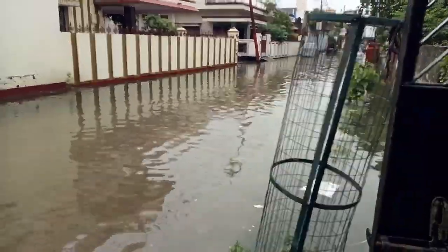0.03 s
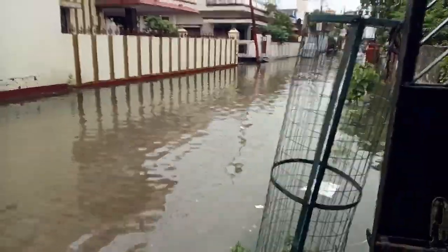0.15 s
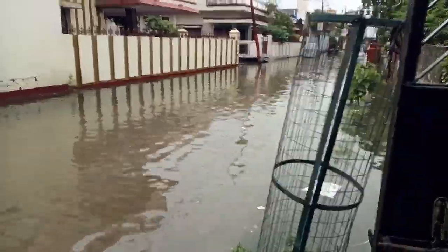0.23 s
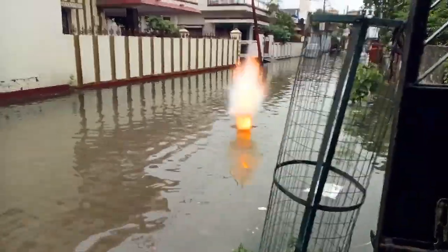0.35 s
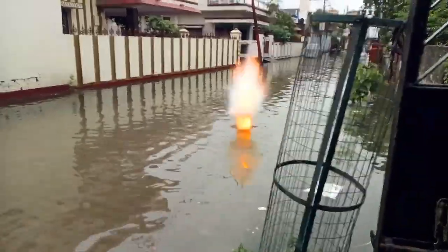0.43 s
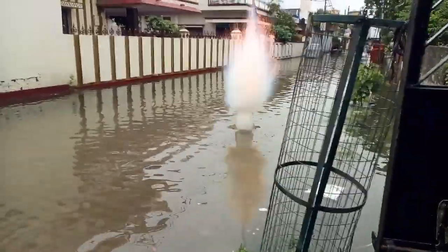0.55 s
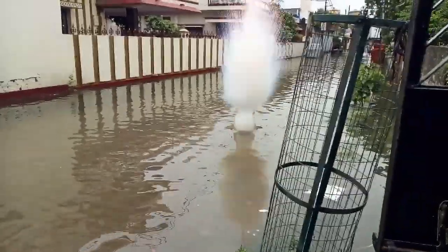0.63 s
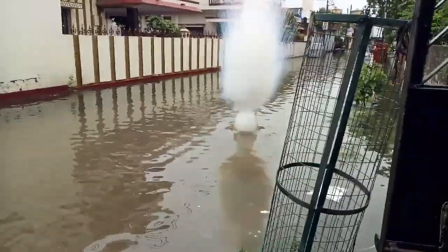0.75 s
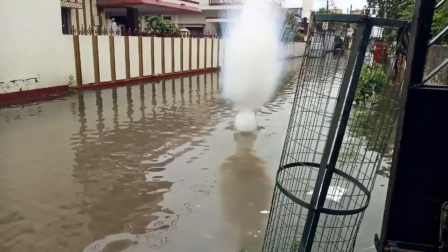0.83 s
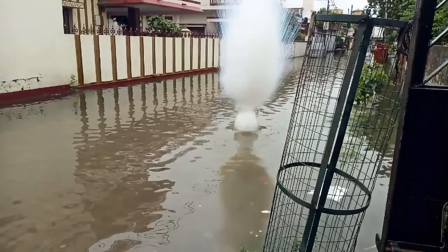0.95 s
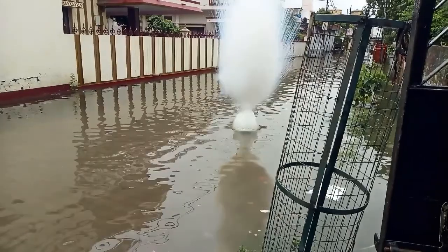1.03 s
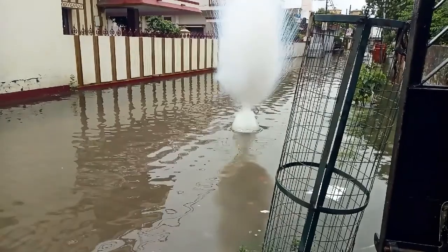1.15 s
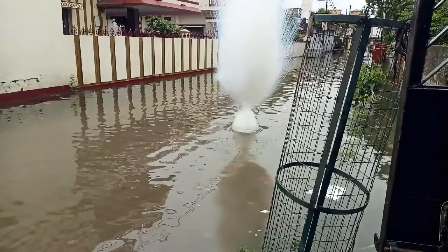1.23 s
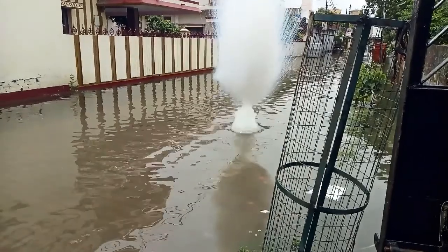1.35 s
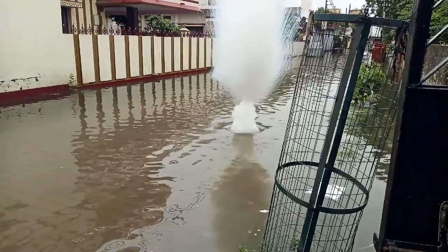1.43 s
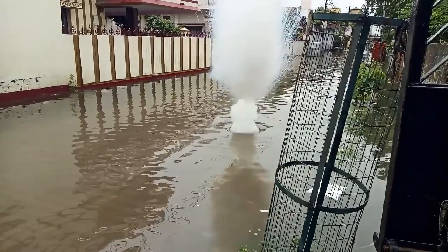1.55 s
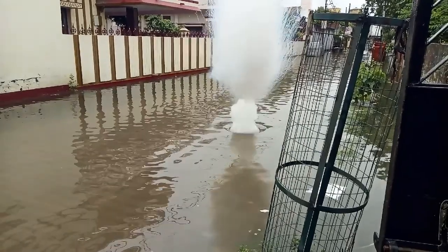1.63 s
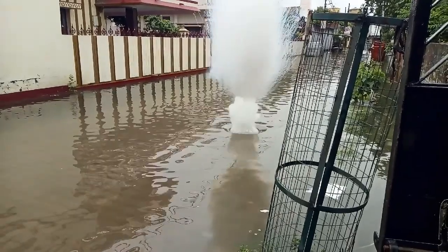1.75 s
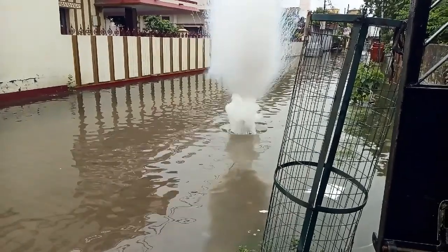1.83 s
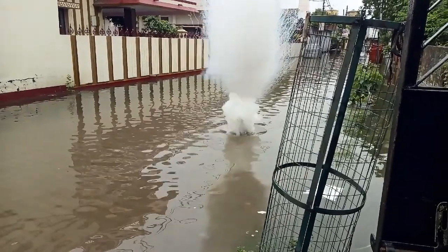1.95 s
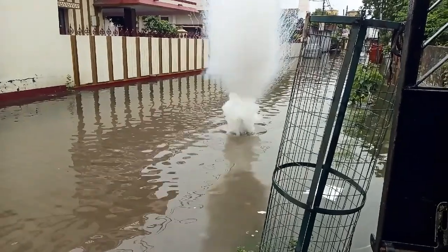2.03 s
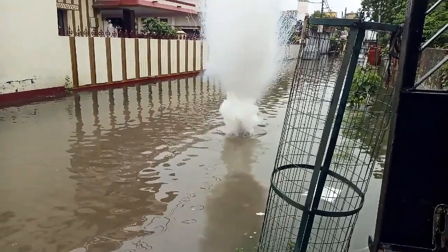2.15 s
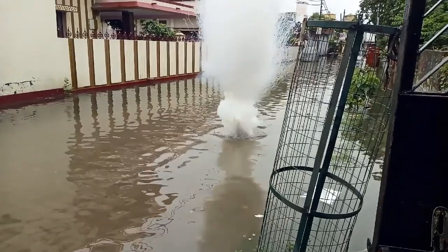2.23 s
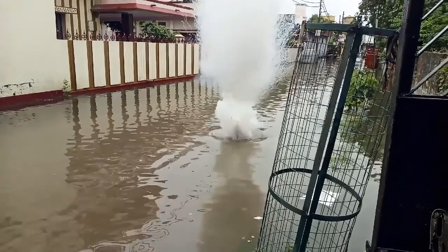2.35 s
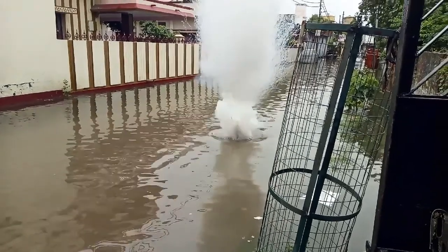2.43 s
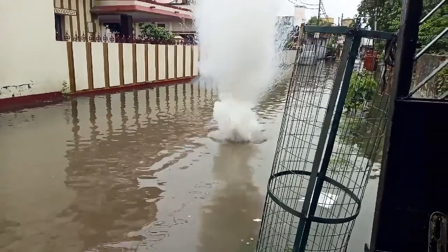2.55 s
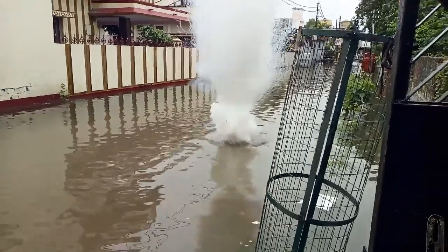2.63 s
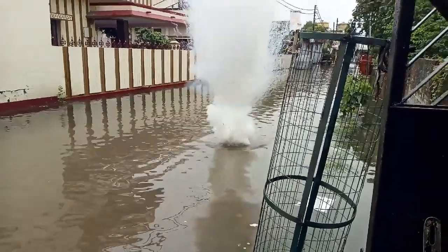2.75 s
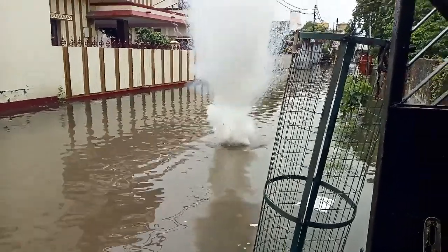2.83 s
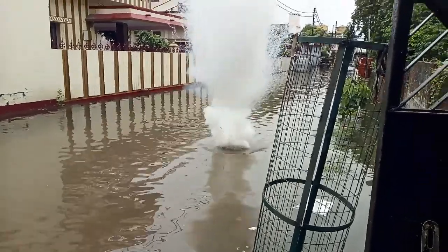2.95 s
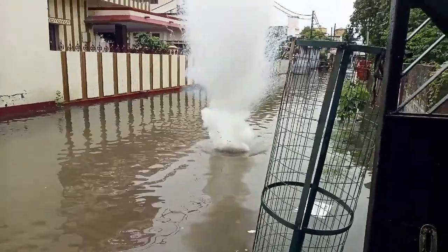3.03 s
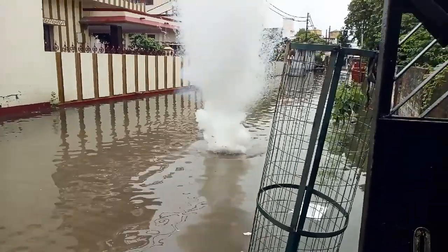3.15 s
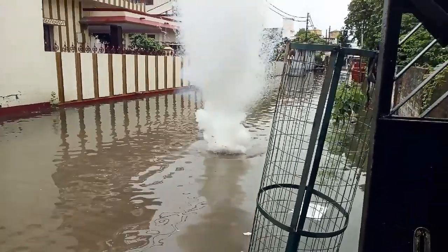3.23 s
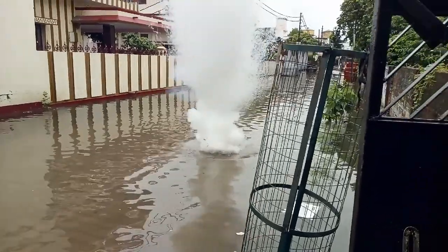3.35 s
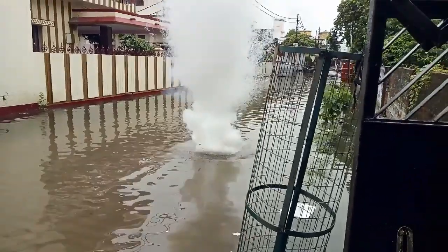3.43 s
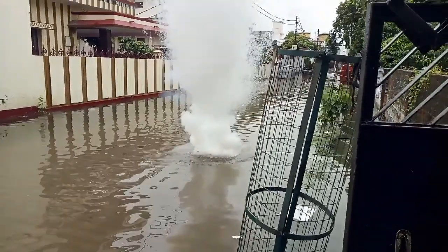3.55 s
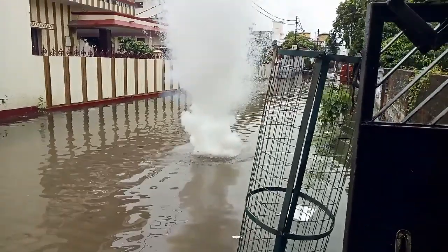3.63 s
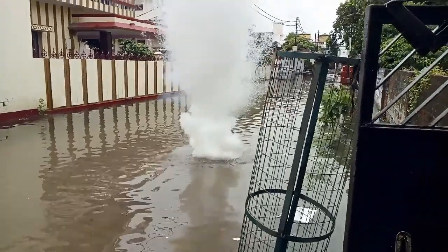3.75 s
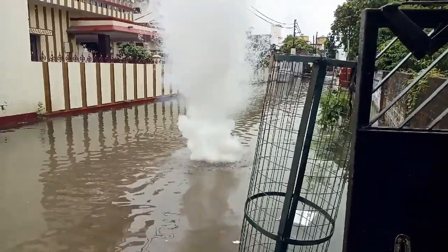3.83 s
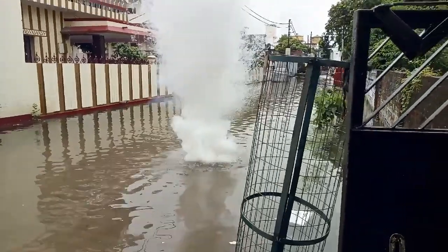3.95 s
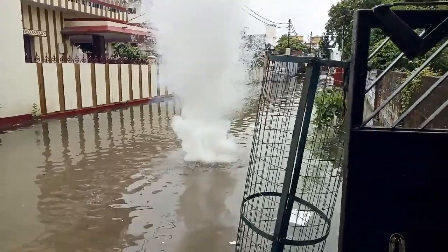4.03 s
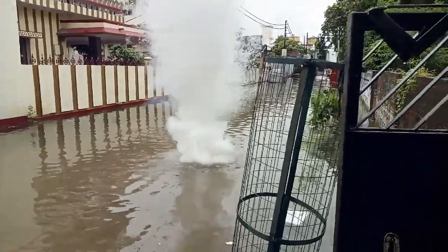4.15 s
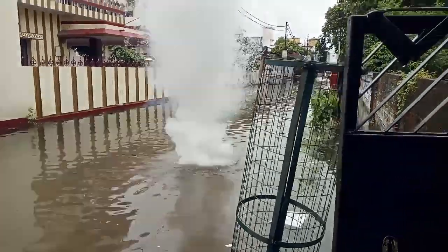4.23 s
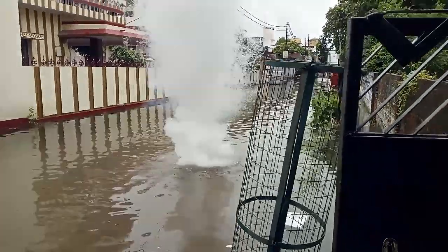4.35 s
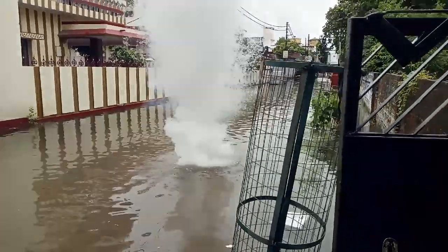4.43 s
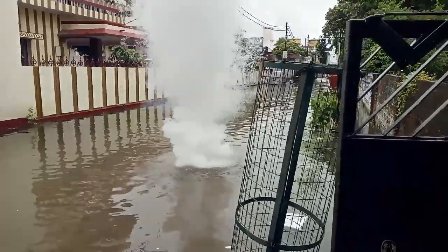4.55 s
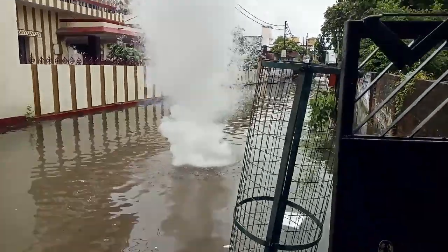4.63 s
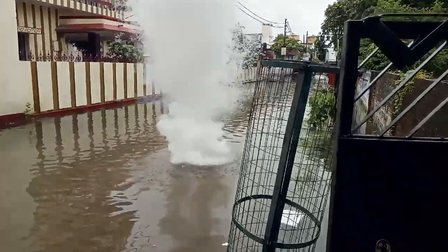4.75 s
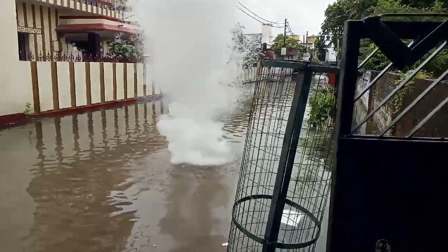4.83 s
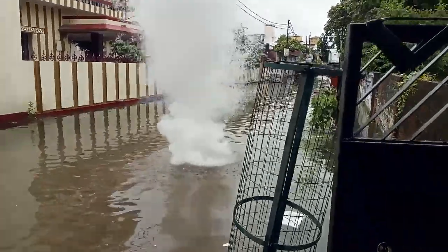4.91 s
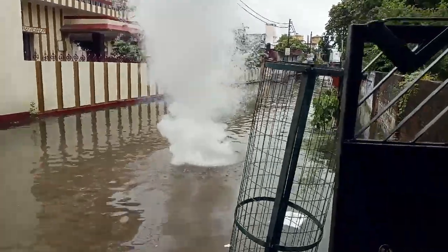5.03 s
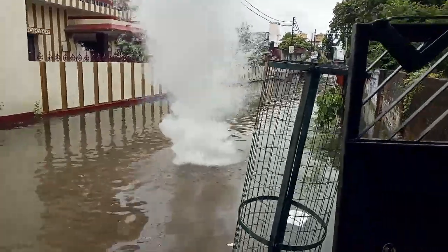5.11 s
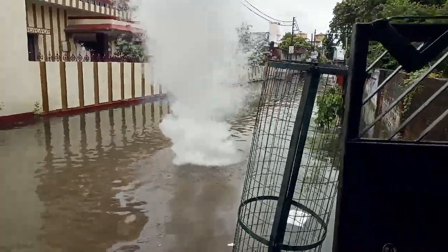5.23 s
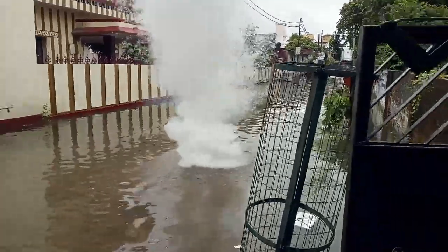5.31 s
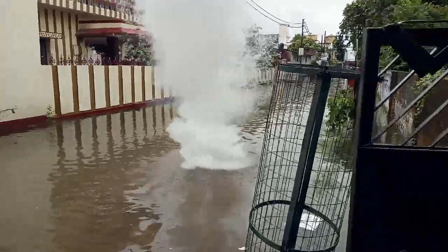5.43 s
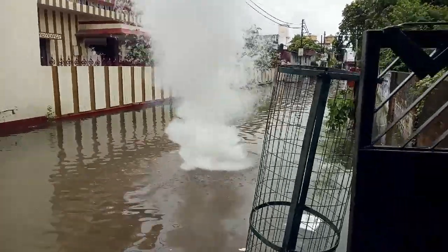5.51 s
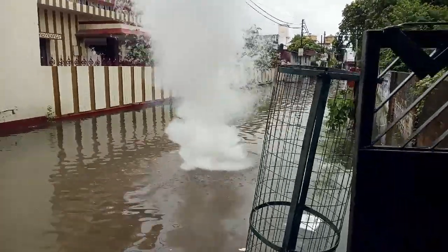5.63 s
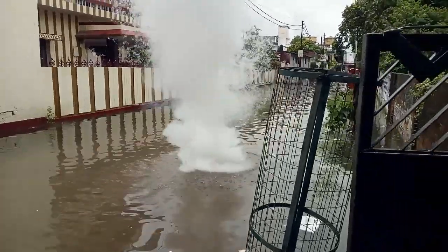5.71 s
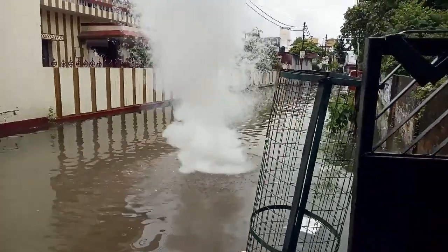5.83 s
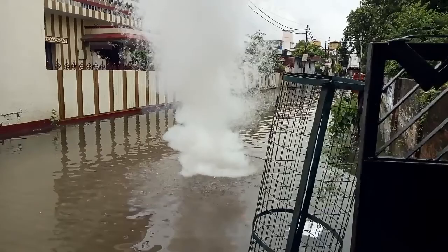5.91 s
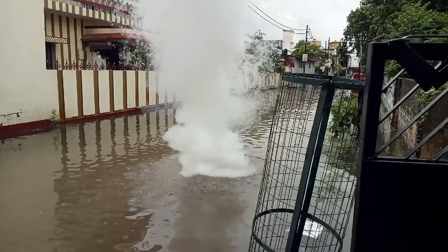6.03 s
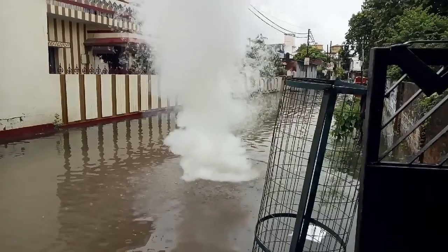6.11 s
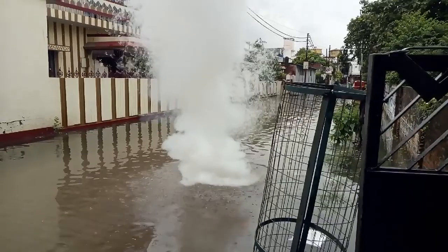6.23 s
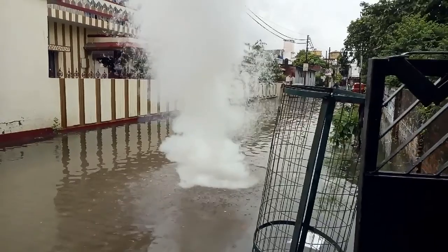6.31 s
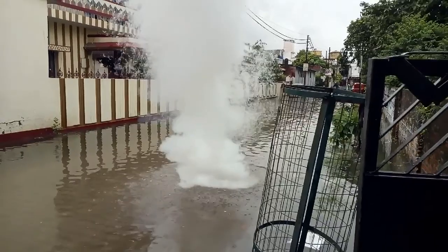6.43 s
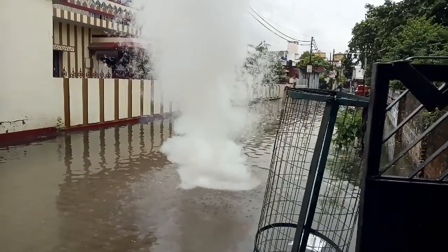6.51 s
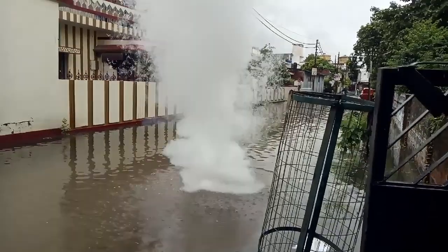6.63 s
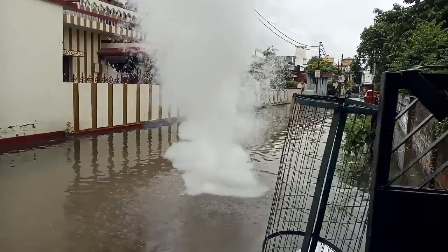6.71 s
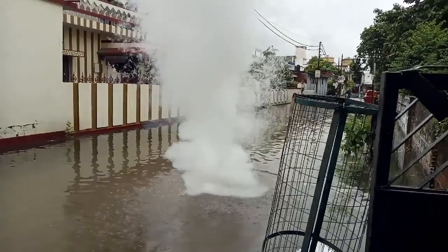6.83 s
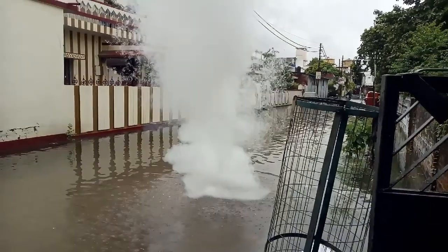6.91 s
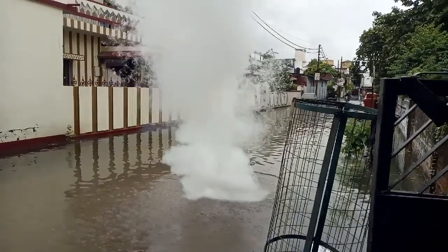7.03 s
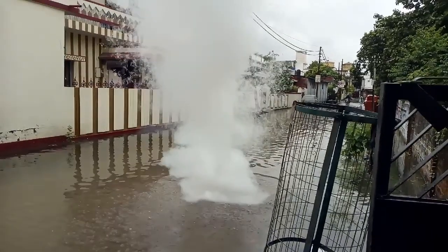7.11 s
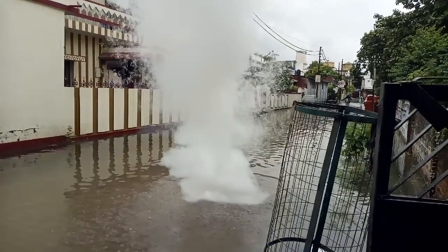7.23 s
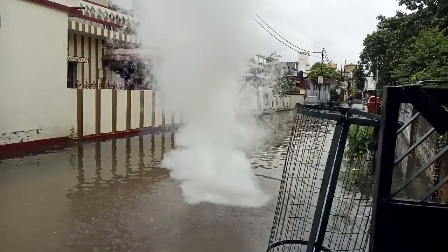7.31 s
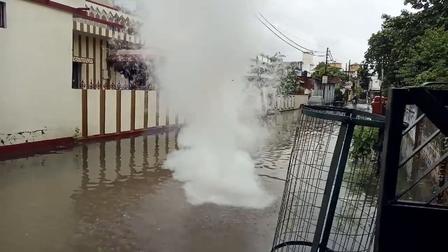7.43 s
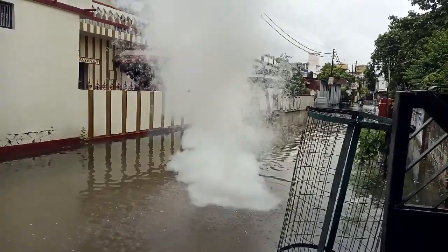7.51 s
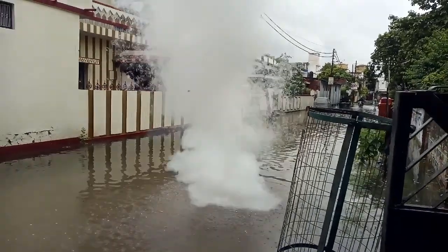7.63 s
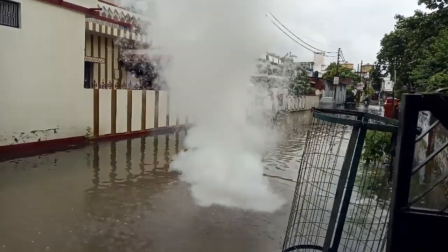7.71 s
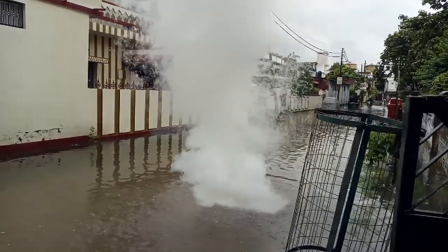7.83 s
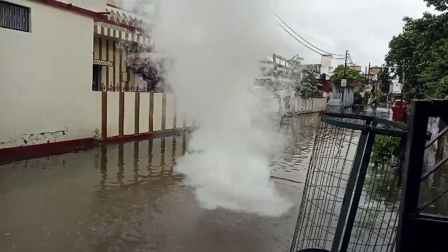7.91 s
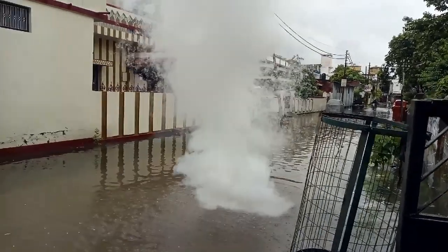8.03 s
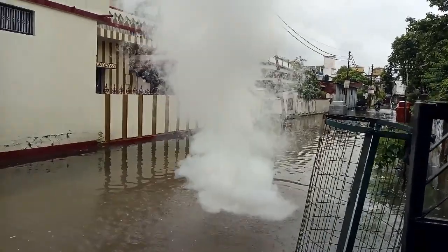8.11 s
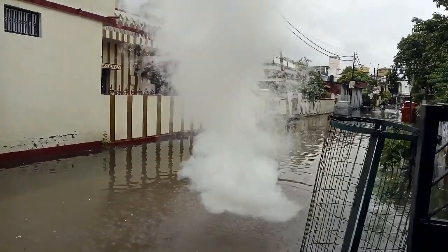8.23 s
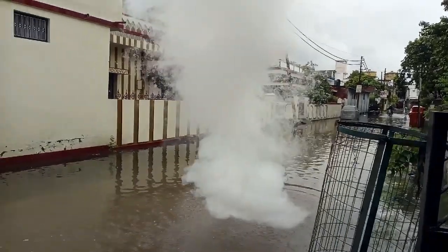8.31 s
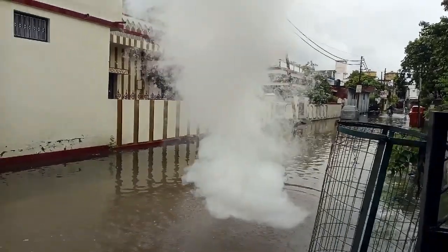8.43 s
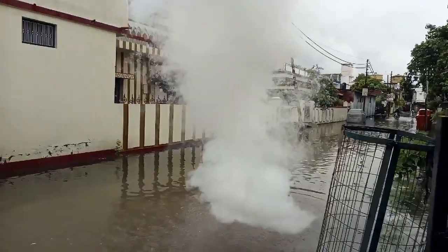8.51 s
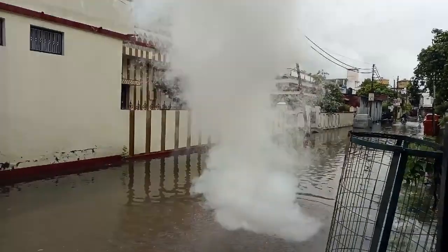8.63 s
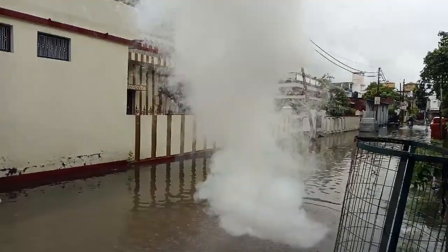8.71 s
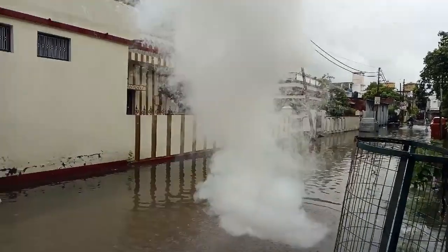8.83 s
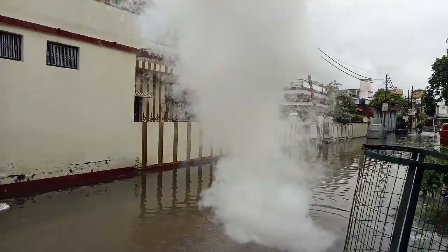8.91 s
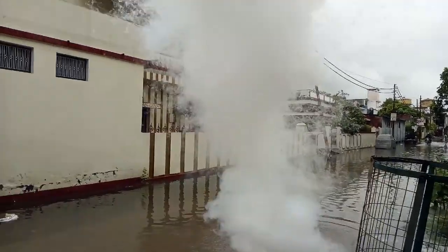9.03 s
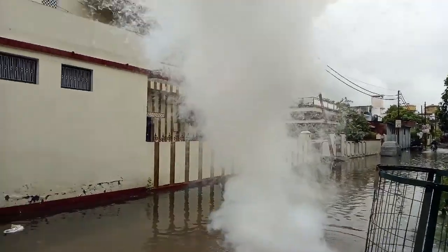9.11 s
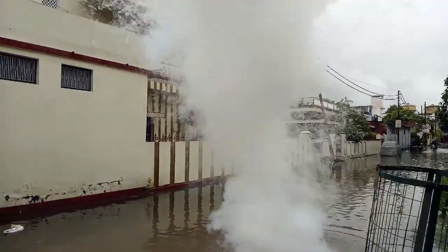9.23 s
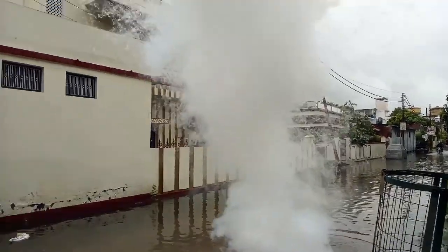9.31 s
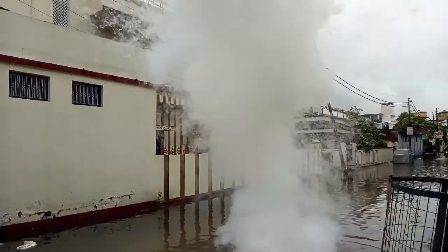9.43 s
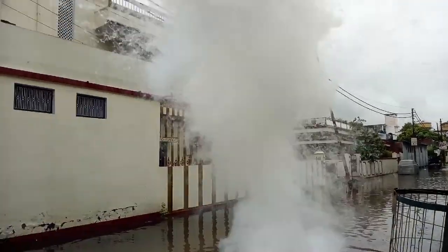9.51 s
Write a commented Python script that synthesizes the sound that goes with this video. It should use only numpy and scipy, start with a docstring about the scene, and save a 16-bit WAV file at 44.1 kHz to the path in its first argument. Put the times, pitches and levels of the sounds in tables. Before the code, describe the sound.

Metal explodes in floodwater with a deep, overloaded slow-motion boom that dies away as drops splash and patter down.

```python
"""Sodium explodes on a flooded street, heard in slow motion. Over a low murmur, a blast overloads the
microphone and rolls between the houses. The burning plume roars and fades as the first heavy drops splash
down. Then spray patters on the water, scattered metal spits, froth rings and faint hums swell far away.
Throughout, the slowed sound is played with each sample held, which lays a gritty sheen over it."""
import sys
import numpy as np
from scipy import signal
from scipy.fft import rfft, irfft, next_fast_len
from scipy.io import wavfile
from scipy.ndimage import uniform_filter1d, map_coordinates

SR = 44100
rng = np.random.default_rng(int(sys.argv[2]) if len(sys.argv) > 2 else 0)


def log_audio(samples):
    """Write samples as a 16-bit WAV file to the path given in sys.argv[1]."""
    # one column per channel
    frames = np.atleast_2d(samples).T
    # limit to full scale, then quantise
    limited = np.clip(frames, -1, 1)
    pcm = np.round(limited * 32767).astype(np.int16)
    wavfile.write(sys.argv[1], SR, pcm)


N = 421596
T = np.arange(N) / SR
BLAST_S = 0.3431


def amp(db):
    """Decibels to gain."""
    return 10 ** (np.asarray(db) / 20)


def unit(x):
    """Scale to rms 1."""
    return x / np.sqrt(np.mean(x ** 2) + 1e-20)


def along(points, hz):
    """Read (freq_hz, value) points joined on a log frequency axis."""
    freqs, values = np.transpose(points)
    return np.interp(np.log(hz + 1), np.log(freqs + 1), values)


def wobble(rate_hz):
    """A smooth random curve through rate_hz knots a second."""
    return map_coordinates(rng.standard_normal(int(N * rate_hz / SR) + 4), [T * rate_hz])


def hump(start_s, length_s):
    """A rounded swell from 0 to 1 and back."""
    return np.sqrt(np.abs(np.sin(np.pi * np.clip((T - start_s) / length_s, 0, 1))))


def filtered(x, response):
    """Filter x by a gain that depends on frequency."""
    size = next_fast_len(len(x) + SR // 2)
    return irfft(rfft(x, size) * response(np.fft.rfftfreq(size, 1 / SR)), size)[:len(x)]


def coloured(x, eq):
    """Shape x with an EQ curve of (freq_hz, gain_db) points, then scale to rms 1."""
    return unit(filtered(x, lambda hz: amp(along(eq, hz))))


def low_pass(x, edge_hz):
    """A steep treble cut with a rounded corner."""
    return filtered(x, lambda hz: (1 - np.tanh((hz - edge_hz) / 70)) / 2)


def saturate(x, top, hardness):
    """Round off the peaks so that they stay under the top."""
    return x / (1 + np.abs(x / top) ** hardness) ** (1 / hardness)


def crackle(per_s, spread_db, share):
    """Tiny clicks of scattered size carry a share of the power; the rest is a smooth rush."""
    clicks = (rng.random(N) < per_s / SR) * rng.choice([-1, 1], N)
    sizes = amp(spread_db * np.clip(rng.standard_normal(N), -2, 2))
    return np.sqrt(share) * unit(clicks * sizes) + np.sqrt(1 - share) * rng.standard_normal(N)


def patchy(x, depth_db):
    """Give x fleeting narrow patches of stronger and weaker sound, as moving reflections do."""
    spectra = signal.stft(x, nperseg=2048)[2]
    patches = uniform_filter1d(rng.standard_normal(spectra.shape), size=2, axis=0)
    patches = uniform_filter1d(patches, size=9, axis=1)
    return signal.istft(spectra * amp(depth_db * unit(patches)), nperseg=2048)[1][:N]


def houses(x, wet_db):
    """Add the diffuse answer of the walls; the mids ring a little longest."""
    # decay of the walls' reverb: freq_hz, t60_s
    walls = [(100, 0.59), (1000, 0.68), (4000, 0.62)]
    hz, t, spectra = signal.stft(rng.standard_normal(SR // 2), SR, nperseg=256)
    decay = amp(-60 * t / along(walls, hz)[:, None])
    tail = signal.istft(spectra * decay, SR, nperseg=256)[1]
    return x + amp(wet_db) * signal.fftconvolve(x, tail / np.linalg.norm(tail))[:len(x)]


def street():
    """The steady low murmur of the open air."""
    # tone of the air: freq_hz, gain_db
    air_eq = [(15, -15), (28, -1.5), (50, -3), (75, -11), (130, -4.5), (250, -17.5), (340, -12.5),
              (410, -13), (510, -9), (620, -10.5), (900, -18), (1300, -18), (1900, -31), (2700, -30.5),
              (3900, -54)]
    level_db = np.interp(T, [0.3, 5, 7], [-47, -48.5, -50.5]) + 0.6 * wobble(5)
    return amp(level_db) * coloured(patchy(rng.standard_normal(N), depth_db=2.0), air_eq)


def shock():
    """The blast front: a hard slap, smeared into a short tail by the nearest walls."""
    slap_eq = [(100, -15), (350, -0.5), (600, 7.0), (1300, -3.5), (2400, -31), (3900, -35)]
    age_s = np.maximum(T - BLAST_S, 0)
    slap = coloured(rng.standard_normal(N), slap_eq)
    return (T > BLAST_S) * amp(-5.0 - 60 * age_s / 0.28) * slap


def fading(level_db, hold_s, fade_db_per_s):
    """A gain that holds for a while after the blast and then falls evenly in dB."""
    return amp(level_db - fade_db_per_s * np.maximum(T - BLAST_S - hold_s, 0))


def blast_envelope(echo, flame):
    """Loud echo and longer, quieter flame add in power; each is (level_db, hold_s, fade_db_per_s)."""
    return np.hypot(fading(*echo), fading(*flame))


def explosion():
    """Dense echoes of the blast merge into the burning plume's roar, over the fireball's deep push."""
    # low body of the blast and flame: freq_hz, gain_db
    rumble_eq = [(24, -47), (40, -6), (91, -1), (144, 2), (189, -1.5), (226, 0), (301, -2.5), (359, -5),
                 (397, -7), (427, -5), (461, -5.5), (578, -7.5), (800, -16), (1040, -35), (1760, -120)]
    # their turbulent midrange: freq_hz, gain_db
    roar_eq = [(350, -16), (600, 0.5), (800, -2), (1000, -2.5), (1300, -3), (1650, -10.5), (1850, -19),
               (2100, -41), (2600, -67)]
    # their ripping top, which dies first: freq_hz, gain_db
    tearing_eq = [(1200, -17), (1800, 8.5), (2100, 2.5), (2550, 2), (3000, -6.5), (3400, -22),
                  (3900, -13.5)]
    push_eq = [(12, -39), (28, -7.5), (55, -12), (130, -24.5), (400, -71)]
    burn_out_s, dying_s = 5.8, 0.78
    churn = amp(0.53 * wobble(22.07))
    rumble = coloured(patchy(rng.standard_normal(N), depth_db=1.8), rumble_eq)
    rumble *= blast_envelope(echo=(-4.2, 0.34, 18.9), flame=(-18.5, 2.11, 11.4))
    roar = coloured(patchy(crackle(per_s=600, spread_db=3.5, share=0.31), depth_db=1.5), roar_eq)
    roar *= blast_envelope(echo=(-8.5, 0.26, 19.4), flame=(-26.5, 1.88, 10.77))
    tearing = coloured(crackle(per_s=370, spread_db=3.5, share=0.35), tearing_eq)
    tearing *= blast_envelope(echo=(-22, 0.41, 24), flame=(-41, 1.74, 21))
    push = coloured(rng.standard_normal(N), push_eq)
    push *= blast_envelope(echo=(-13, 0.03, 22), flame=(-34.5, 1.8, 6.9))
    attack = np.clip((T - BLAST_S) / 0.0013, 0, 1)
    burning = np.clip((burn_out_s - T) / dying_s, 0, 1)
    return attack * burning * (churn * (rumble + roar + tearing) + push)


def surges():
    """Suction in the wake of the front, strong enough to pin the microphone."""
    # humps of under-pressure: start_s, length_s
    pulls = [(0.368, 0.0069), (.427, 0.016), (0.518, 0.0066)]
    return -2.54 * sum(hump(start_s, length_s) for start_s, length_s in pulls)


def splashes():
    """Each heavy drop is a thump, a short splat, a ringing bubble and a plop; the walls answer."""
    # heavy drops and lumps hitting the water: start_s, level_db, bubble_hz
    impacts = [(2.096, -28, 1340), (3.858, -29, 292), (5.187, -39, 985), (6.228, -34, 1350),
               (6.247, -37.5, 796), (6.359, -39, 1327), (6.693, -35, 1345), (7.104, -38, 1190),
               (7.267, -33, 1005), (7.373, -36.5, 1027), (7.465, -35.5, 1023), (7.617, -34, 1356),
               (8.469, -31.5, 950), (8.602, -33.5, 1336), (9.058, -41.5, 765), (9.335, -33, 920)]
    thump_eq = [(80, -18), (220, 3.0), (500, 8.0), (900, -31.5)]
    splat_eq = [(350, -15), (700, -4.5), (1300, 0.0), (1900, -22), (3000, -55)]
    out, t = np.zeros(N + SR), np.arange(SR // 2) / SR
    attack = 1 - np.exp(-t / 0.0013)  # water gives way softly
    for start_s, level_db, bubble_hz in impacts:
        thump = amp(-19 - 60 * t / 0.1) * coloured(rng.standard_normal(len(t)), thump_eq)
        splat = amp(-4 - 60 * t / 0.068) * coloured(rng.standard_normal(len(t)), splat_eq)
        bubble = amp(-3.5 - 60 * t / 0.11) * np.sin(2 * np.pi * bubble_hz * t)
        plop = amp(-2 - 60 * t / 0.012) * np.sin(2 * np.pi * 1050 * t)
        splash = attack * (thump + splat + bubble + plop)
        out[round(start_s * SR):][:len(t)] += amp(level_db) * houses(splash, wet_db=-1)
    return out[:N]


def spray():
    """Countless drops land on the flood in uneven flurries and thicken to a steady shower."""
    # tone of drops on water: freq_hz, gain_db
    patter_eq = [(80, -37), (160, -1.5), (280, -2), (340, -3.5), (450, -4), (600, -9), (760, -5.5),
                 (950, -2.5), (1250, -2.5), (1500, -6.5), (1900, -19.5), (2700, -20), (3100, -26.5),
                 (3900, -30.5)]
    start_s, build_s = 4.26, 2.72
    level_db = np.interp(T, [start_s, start_s + build_s], [-56.5, -45.5]) + 0.13 * wobble(31)
    fade_in = np.clip((T - start_s) / 0.43, 0, 1)
    drops = patchy(crackle(per_s=260, spread_db=4.0, share=0.46), depth_db=1.5)
    return amp(level_db) * fade_in * coloured(houses(drops, wet_db=2), patter_eq)


def spits():
    """Each spit of scattered metal is a sharp sting and a short sizzle."""
    # bits of metal spitting: start_s, level_db, sizzle_t60_s
    bits = [(5.187, -58, .12), (6.247, -49, .07), (7.104, -45, .025), (7.11, -39, .06), (7.131, -46, .035),
            (7.267, -51, .07), (7.617, -47, 0.15), (8.469, -51, .08), (9.336, -49, .14)]
    hiss_eq = [(500, -9), (1400, 5), (2100, 6), (2800, 11), (3900, -8)]
    out, t = np.zeros(N + SR), np.arange(SR // 2) / SR
    sting = amp(-1.5 - 60 * t / 0.01)
    for start_s, level_db, sizzle_t60_s in bits:
        sizzle = amp(-2.5 - 60 * t / sizzle_t60_s)
        hiss = coloured(rng.standard_normal(len(t)), hiss_eq)
        out[round(start_s * SR):][:len(t)] += amp(level_db) * (sting + sizzle) * hiss
    return out[:N]


def froth():
    """Bubbles trapped by the drops ring briefly, each near the pitch of its size."""
    # three bubble sizes, the larger ones later: pitch_hz, scatter_share, t60_s, start_s, level_db
    sizes = [(1357, 0.0233, 0.32, 6.0, -54.5), (972, 0.072, 0.12, 6.9, -51.5), (752, 0.093, 0.1, 7.9, -53)]
    count, build_s = 500, 0.47
    out, t = np.zeros(N), np.arange(SR // 10) / SR
    attack = 1 - np.exp(-t / 0.004)
    for pitch_hz, scatter_share, t60_s, start_s, level_db in sizes:
        onsets_s = rng.uniform(start_s, N / SR, size=(count, 1))
        detune, strength = rng.standard_normal(size=(2, count, 1))
        envelopes = attack * amp(2 * np.clip(strength, -2, 2) - 60 * t / t60_s)
        rings = envelopes * np.sin(2 * np.pi * pitch_hz * (1 + scatter_share * detune) * t)
        places = (onsets_s * SR).astype(int) + np.arange(len(t))
        chorus = np.bincount(places.ravel(), rings.ravel(), N)[:N]  # mix each ring in at its onset
        fade_in = np.clip((T - start_s) / build_s, 0, 1)
        out += amp(level_db) * fade_in * chorus / np.std(chorus[T > start_s])
    return out


def hums():
    """Soft wavering tones swell and fade far down the street."""
    # distant hums: start_s, length_s, pitch_hz, level_db
    tones = [(6.14, 0.15, 116, -48), (7.74, 0.2, 278, -49.5), (7.866, 0.44, 174, -47),
             (8.447, 0.092, 173, -48.5), (9.287, 0.18, 292, -45)]
    out = np.zeros(N)
    for start_s, length_s, pitch_hz, level_db in tones:
        swell = amp(level_db + 1.4 * wobble(18)) * hump(start_s, length_s)
        wavering_hz = pitch_hz * (1 + 0.0116 * wobble(14))
        out += swell * np.sin(2 * np.pi * np.cumsum(wavering_hz) / SR)
    return out


def scene():
    """The blast, its fallout and the background meet at one microphone."""
    blast = shock() + explosion() + surges()
    fallout = spray() + froth() + splashes() + spits()
    return (blast + fallout + hums() + street())[None]


def record(dry):
    """The microphone overloads and drifts back to zero; the samples clip and are held as gritty steps."""
    low_cut_hz, hold_hz = 16, 11997.4
    pinned = saturate(dry[0], top=1.2, hardness=4)
    centred = signal.sosfilt(signal.butter(2, low_cut_hz, "high", fs=SR, output="sos"), pinned)
    clipped = saturate(centred, top=0.99, hardness=13)
    dulled = low_pass(clipped, edge_hz=3900)  # the narrow band of slowed sound
    held = np.interp(np.floor(T * hold_hz) / hold_hz, T, dulled)
    return low_pass(held, edge_hz=15800)[None]


dry = scene()
out = record(dry)
log_audio(out)
```